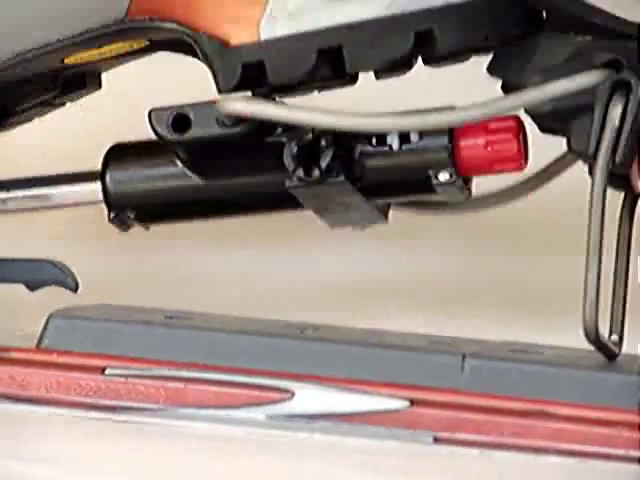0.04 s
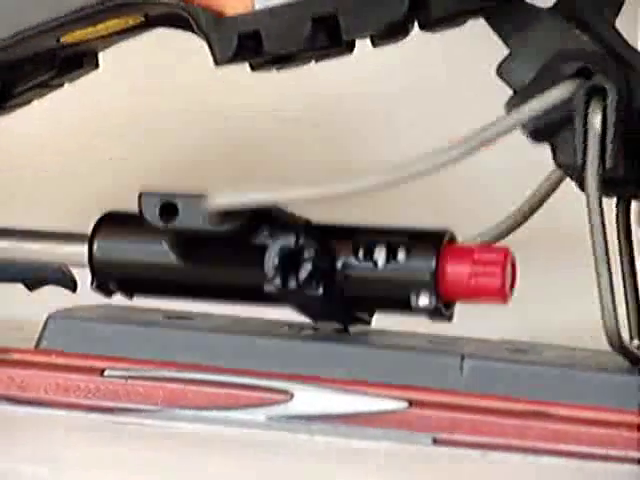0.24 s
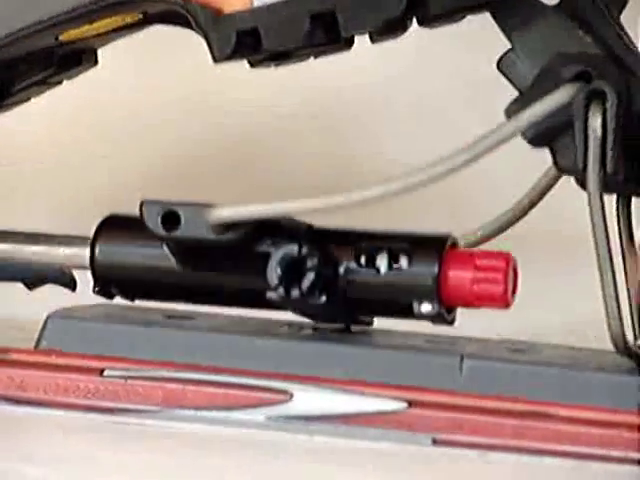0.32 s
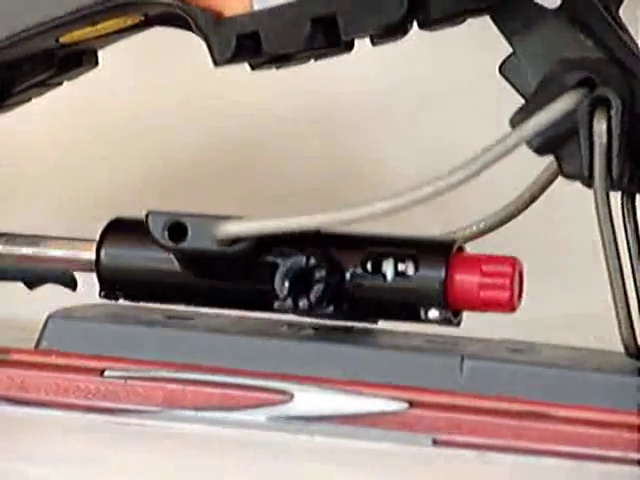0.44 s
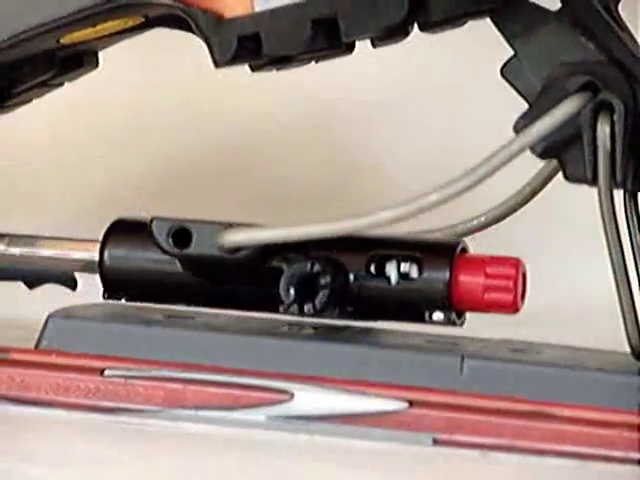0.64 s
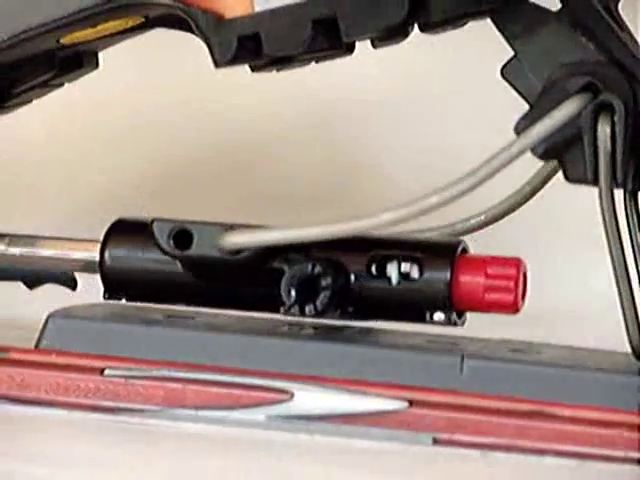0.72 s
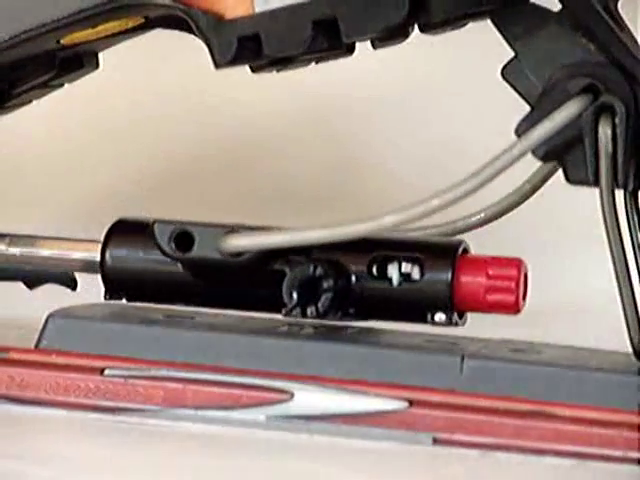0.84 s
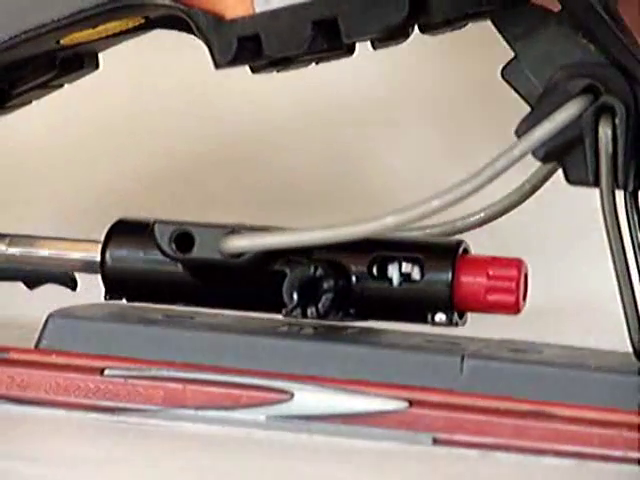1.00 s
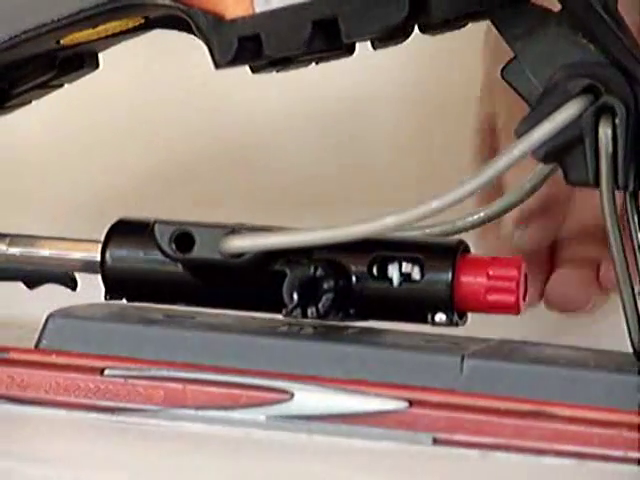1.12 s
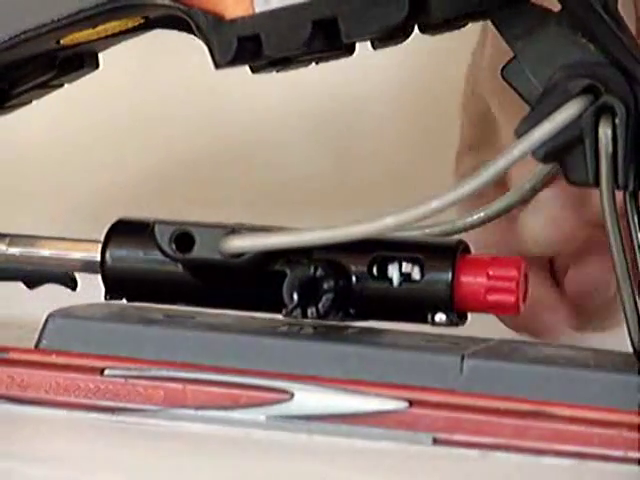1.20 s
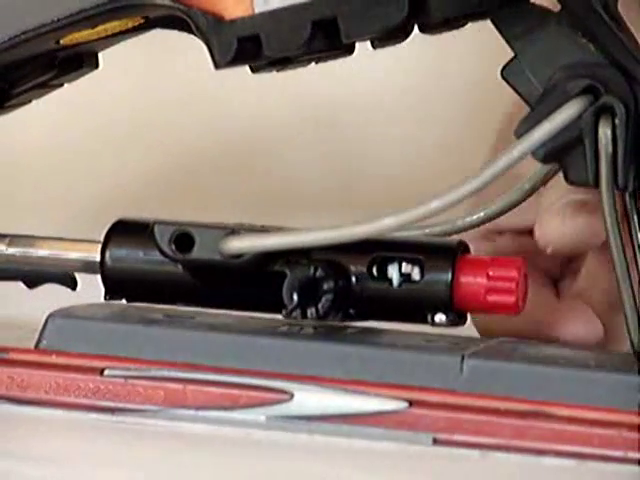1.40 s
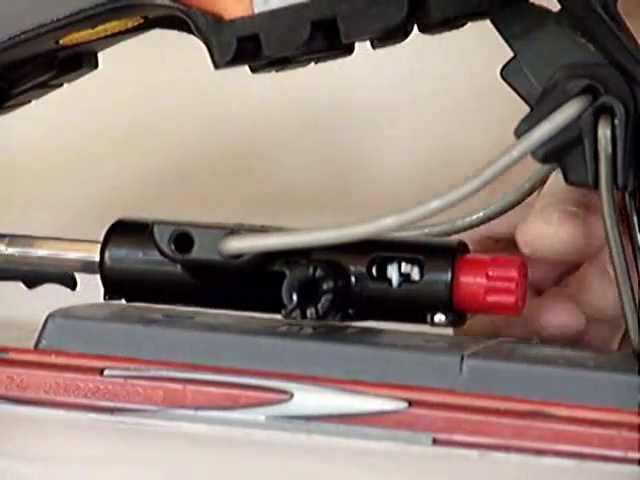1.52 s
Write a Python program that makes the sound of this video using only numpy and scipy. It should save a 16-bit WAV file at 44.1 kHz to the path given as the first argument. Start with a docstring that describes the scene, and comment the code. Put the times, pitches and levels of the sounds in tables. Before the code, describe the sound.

Close by in a small, quiet room, a ski binding locks with a loud, sharp clack after a quick run of metal clicks, scraping and dull knocks. Afterwards the boot settles and a hand softly rubs and taps the mechanism.

```python
"""Boot into a ski binding

Small room, one close microphone, quiet room tone. The heel piece clicks and scrapes along the boot
and the ski knocks on the floor. Then the spring snaps shut with one hard clack that sets ski and
housing ringing. Afterwards the boot settles and a hand rubs and ticks over the mechanism."""
import sys
import numpy as np
from scipy import signal
from scipy.fft import rfft, irfft
from scipy.io import wavfile

SR = 44100
rng = np.random.default_rng(int(sys.argv[2]) if len(sys.argv) > 2 else 0)


def unload_wav(signal):
    """Save mono or channel-first audio to the path in sys.argv[1] as 16-bit WAV at rate SR, clipped to [-1, 1]."""
    wavfile.write(
        sys.argv[1],
        SR,
        np.round(np.clip(np.atleast_2d(signal).T, -1, 1) * 32767).astype(np.int16),
    )


N = 68355
T = np.arange(N) / SR


def from_db(db):
    """Decibels to gain."""
    return 10 ** (np.asarray(db) / 20)


def unit(x):
    """Scale to energy 1."""
    return x / np.sqrt(np.sum(x ** 2) + 1e-20)


def at_hz(points, hz):
    """Read a table on a log-frequency axis."""
    freqs, values = np.transpose(points)
    return np.interp(np.log(np.maximum(hz, 1)), np.log(freqs), values)


def through(x, response):
    """Pass a sound through an impulse response."""
    return signal.fftconvolve(x, response)[:N]


def impulse_response(colour, size=8192):
    """Minimum-phase response with the given spectrum."""
    gain = from_db(at_hz(colour, np.linspace(0, SR / 2, size // 2 + 1)))
    cepstrum = irfft(np.log(gain))
    cepstrum[1:size // 2] *= 2
    cepstrum[size // 2 + 1:] = 0
    return irfft(np.exp(rfft(cepstrum)))


def decay(t60_s):
    """Envelope that loses 60 dB in t60_s."""
    return np.exp(-np.log(1000) * T / max(t60_s, 1e-3))


def delayed(x, start_s):
    """Start a sound at start_s."""
    return np.concatenate([np.zeros(max(int(start_s * SR), 0)), x])[:N]


def chatter(t60_s):
    """A dying flurry of tiny contacts, energy 1."""
    return unit(rng.standard_normal(N) * decay(t60_s))


def ring(pitch_hz, level_db, t60_s):
    """One struck mode."""
    return from_db(level_db) * np.sin(2 * np.pi * pitch_hz * T) * decay(t60_s)


def reverb(x):
    """Diffuse reflections of the small room; the lows last longest."""
    # reverberation time: freq_hz, t60_s
    room_t60 = [(100, 0.83), (260, 0.58), (700, 0.57), (2500, 0.45), (5000, 0.42), (10000, 0.4)]
    edges_hz = np.geomspace(40, 16000, 11)
    white = rfft(rng.standard_normal(2 * N))
    hz = np.arange(N + 1) * SR / (2 * N)
    tail = 0
    for low, high in zip(edges_hz, edges_hz[1:]):
        band = irfft(white * ((hz >= low) & (hz < high)))[:N]
        tail += band * decay(at_hz(room_t60, np.sqrt(low * high)))
    return through(x, unit(delayed(tail, .007)))   # first echo after 7 ms


def in_room(force, colour, room_db):
    """A force sounds through a body and into the room."""
    direct = through(force, unit(impulse_response(colour)))
    return direct + from_db(room_db) * reverb(direct)


def clicks(contacts, colour, ring_t60_s, room_db):
    """Each click is a brief chatter with its own brightness, plus the ring of the part touched."""
    direct = 0
    for start_s, level_db, t60_s, tilt, ring_hz, ring_db in contacts:
        tilted = [(hz, db + tilt * np.log2(hz)) for hz, db in colour]
        click = from_db(level_db) * through(chatter(t60_s), unit(impulse_response(tilted)))
        direct += delayed(click + ring(ring_hz, ring_db, ring_t60_s), start_s)
    return direct + from_db(room_db) * reverb(direct)


def friction(levels, grains_per_s, spread_db, surge_db, slip_s=.004):
    """Random grains of uneven size under a level curve, surging as the surfaces grip and slip."""
    sizes = from_db(spread_db * np.minimum(rng.exponential(1, N), 4)) * rng.choice([-1, 1], N)
    surges = np.interp(T / slip_s, np.arange(N), np.clip(rng.standard_normal(N), -2, 2))
    grains = sizes * from_db(surge_db * surges) * (rng.random(N) < grains_per_s / SR)
    envelope = from_db(np.interp(T, *np.transpose(levels)))
    return unit(grains) * np.sqrt(N) * envelope


def room_tone(level_db=-55):
    """Faint, steady noise of the room."""
    # background spectrum: freq_hz, level_db
    colour = [(20, -10), (40, -19), (60, -3.5), (80, -12), (130, -5), (250, 2), (400, -3), (1000, -6),
              (2000, -8), (3200, -9.5), (5000, -13.5), (8000, -15.5), (9800, -18), (11000, -30.5),
              (12500, -33)]
    return from_db(level_db) * through(rng.standard_normal(N), unit(impulse_response(colour)))


def rubbing():
    """The boot settles, then the hand rubs along the binding."""
    # course of the rubbing: time_s, level_db
    levels = [(0.5, -82), (0.56, -53), (0.6, -51.5), (0.67, -58.5), (0.74, -51), (0.79, -52), (0.85, -71),
              (1.06, -63), (1.095, -47.5), (1.145, -53), (1.163, -42), (1.18, -53), (1.21, -45.5),
              (1.25, -57), (1.288, -51), (1.305, -45.5), (1.385, -48), (1.43, -51), (1.5, -54), (1.55, -49)]
    # rub spectrum: freq_hz, level_db
    colour = [(40, -20), (80, -16), (150, -7), (300, -3), (800, -3.5), (1400, -0.5), (2000, -1),
              (3200, -2.5), (4500, -7), (6000, -14.5), (8500, -11), (9800, -17), (11000, -25), (12500, -27)]
    force = friction(levels, grains_per_s=4000, spread_db=2.5, surge_db=2.3)
    return in_room(force, colour, room_db=-6)


def finger_ticks():
    """Fingers tick on the housing."""
    # finger contacts: start_s, level_db, t60_s, tilt_db_per_octave, ring_hz, ring_db
    contacts = [(1.085, -18, 0.066, 3, 4180, -37), (1.163, -18, 0.038, 5.3, 1590, -39),
                (1.196, -25, 0.033, -6.5, 1450, -51), (1.2035, -15.5, 0.0098, -2.5, 1920, -44),
                (1.297, -21, 0.051, -4.5, 2043, -34), (1.36, -24, 0.04, 1.5, 1710, -36),
                (1.382, -26, 0.035, -4, 1330, -39)]
    # tick spectrum: freq_hz, level_db
    colour = [(50, -44), (150, -14), (600, -6), (1600, 4), (2800, 1), (4300, 1), (6200, -16), (8800, -5.5),
              (12000, -25)]
    return clicks(contacts, colour, ring_t60_s=0.027, room_db=-8)


def ski_knocks():
    """Dull blows on the floor as the ski takes the weight."""
    # floor contacts: start_s, level_db
    blows = [(0.085, -15), (0.128, -16.5), (0.178, -18), (0.203, -8), (0.314, -9.5), (0.366, -26),
             (1.31, -24.5), (1.385, -32)]
    # knock spectrum: freq_hz, level_db
    colour = [(40, -47), (90, -23), (135, -1), (190, -4), (270, 1.5), (420, 0), (650, -9.5), (1200, -28),
              (4000, -61)]
    force = sum(delayed(from_db(db) * chatter(t60_s=0.05), start_s) for start_s, db in blows)
    return in_room(force, colour, room_db=-3)


def body_ring():
    """Ski and sprung housing ring after one blow."""
    # their modes: pitch_hz, level_db, t60_s
    modes = [(278, -33, 0.49), (439, -32, 0.3), (483, -26.5, 0.26), (537.4, -22, 0.19), (666.6, -31, 0.23),
             (718, -39, 0.44), (1051, -36.5, 0.19), (2476, -29, 0.44), (2540, -36, 0.22), (2638, -35, 0.48),
             (2735, -21, 0.19), (2815, -35, .3), (2880, -25, 0.15), (2995, -31, 0.2), (3200, -37.5, 0.35),
             (9400, -41, .09)]
    return sum((-1) ** k * ring(*mode) for k, mode in enumerate(modes))


def heel_scrape(ring_db=-8.5):
    """The heel piece scrapes along the boot and faintly rings ski and housing."""
    # course of the scrape: time_s, level_db
    levels = [(0, -58), (0.03, -63), (0.06, -51), (0.076, -71), (0.088, -46), (0.108, -39), (0.119, -33),
              (0.138, -33.5), (0.145, -34.5), (0.175, -37.5), (0.2, -41.5), (0.228, -40), (0.24, -52),
              (0.265, -47), (0.28, -83), (0.304, -35), (0.325, -44), (0.36, -76), (0.385, -73), (0.41, -86)]
    # scrape spectrum: freq_hz, level_db
    colour = [(40, -48), (70, -24), (140, -5.5), (500, 5.5), (800, -1), (1500, 0.5), (2800, 0), (3900, -10),
              (5100, -11), (6300, -12), (8000, -13.5), (9600, -14), (10600, -21.5), (12500, -21)]
    force = friction(levels, grains_per_s=2500, spread_db=3.0, surge_db=2.0)
    ringing = from_db(ring_db) * through(force, unit(body_ring()))
    return in_room(force, colour, room_db=-7) + ringing


def metal_clicks():
    """Small metal parts click as the boot steps in."""
    # metal contacts: start_s, level_db, t60_s, tilt_db_per_octave, ring_hz, ring_db
    contacts = [(0.0803, -6.5, 0.056, 0, 2050, -29.5), (0.1175, -10, .04, 3.5, 2880, -36),
                (0.1285, -7.5, 0.034, 7.5, 2730, -31), (0.135, -5.5, 0.027, 3, 4980, -29),
                (0.156, -14.5, 0.011, -1, 2540, -29.5), (0.181, -8, 0.028, 1, 2654, -26.5),
                (0.2902, -5.5, 0.045, 3.5, 2717, -24), (0.2935, -12.5, 0.066, 0, 1177, -25)]
    # click spectrum: freq_hz, level_db
    colour = [(50, -31), (130, -17), (400, -5.5), (700, -10.5), (1200, -1), (2700, 0), (3800, -5.5),
              (4900, -3), (6300, -10), (7800, -7.5), (9600, -16.5), (11000, -28), (12500, -29)]
    return clicks(contacts, colour, ring_t60_s=0.034, room_db=-6.5)


def clack(chatter_db=-1.5):
    """The catch slips, slams home and rebounds within milliseconds; the main blow rings the body."""
    # hits of the catch: start_s, level_db
    hits = [(0.3911, -16), (0.39, -17.5), (0.3925, 6.5), (0.3942, 3.5), (0.3951, 5), (0.3963, -1.5),
            (0.4046, -7.5)]
    # clack spectrum: freq_hz, level_db
    colour = [(40, -57), (65, -24), (90, -23), (130, -14), (250, -5), (380, -7), (530, 0.5), (800, -8.5),
              (1020, -2), (1300, -8), (1700, -4), (2100, -5.5), (2750, 3), (3400, -3.5), (4000, -14.5),
              (4900, -8.5), (6000, -17.5), (8300, -21), (9400, -21), (11400, -27), (12600, -44)]
    # how much of the clack the room returns: freq_hz, gain_db
    room_return = [(100, 1), (250, -1), (600, -3), (1500, -4.5), (2800, -3.3), (4800, -13), (7000, -9),
                   (10000, -3.5)]
    pulse = signal.unit_impulse(N)
    force = 0
    for start_s, level_db in hits:
        contact = pulse + from_db(chatter_db) * chatter(t60_s=0.011)
        force += delayed(from_db(level_db) * contact, start_s)
    body = unit(impulse_response(colour))
    main_s = max(hits, key=lambda hit: hit[1])[0]
    # one blow with the energy of all the hits excites the room
    blow = delayed(through(pulse, body), main_s) * np.sqrt(np.sum(force ** 2))
    reflections = through(reverb(blow), impulse_response(room_return))
    return through(force, body) + delayed(body_ring(), main_s) + reflections


def scene():
    """Stepping in, the clack and the handling over room tone, in mono."""
    small_sounds = rubbing() + metal_clicks() + finger_ticks()
    return (small_sounds + room_tone() + heel_scrape() + ski_knocks() + clack())[None]


def record(dry):
    """The highest peak is rounded off at the overload level and the top treble is cut."""
    overload, cutoff_hz = .92, 12700
    rounded = dry / (1 + (dry / overload) ** 6) ** (1 / 6)
    lowpass = signal.ellip(8, .1, 50, cutoff_hz, fs=SR, output="sos")
    return signal.sosfiltfilt(lowpass, rounded)


dry = scene()
out = record(dry)
unload_wav(out)
```